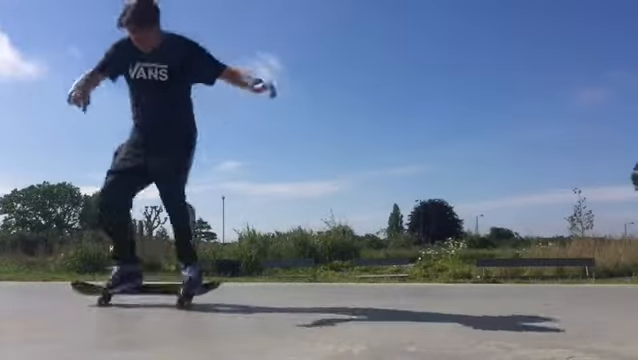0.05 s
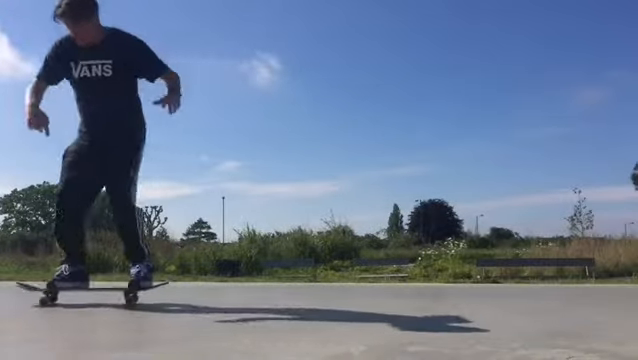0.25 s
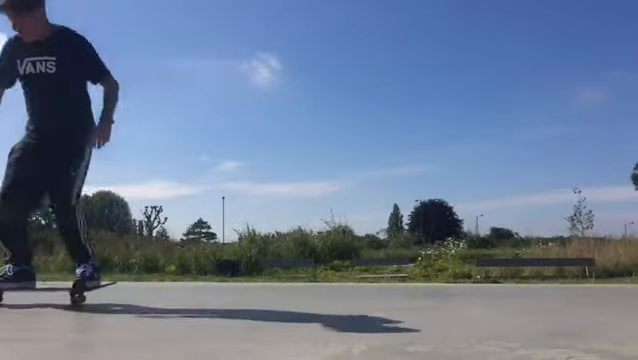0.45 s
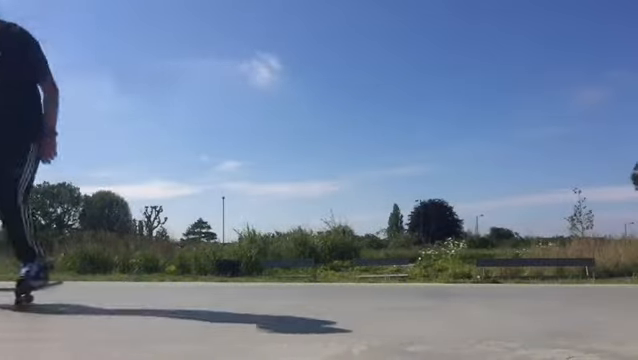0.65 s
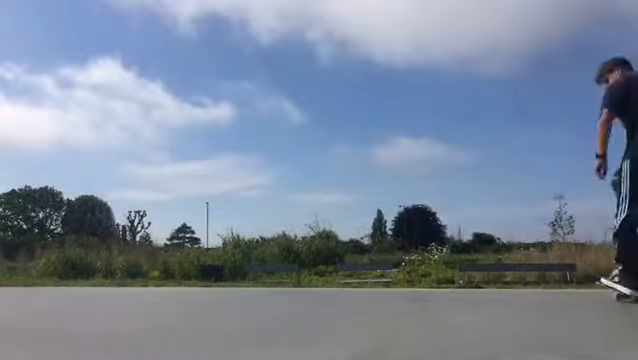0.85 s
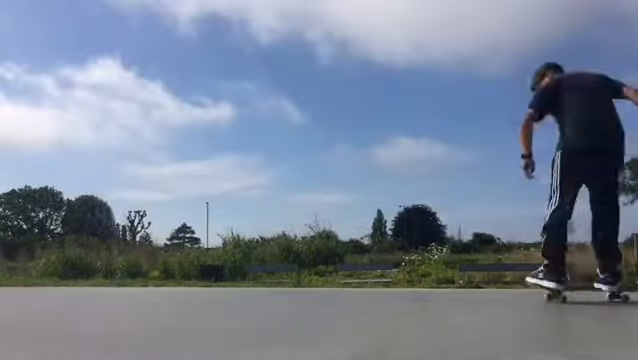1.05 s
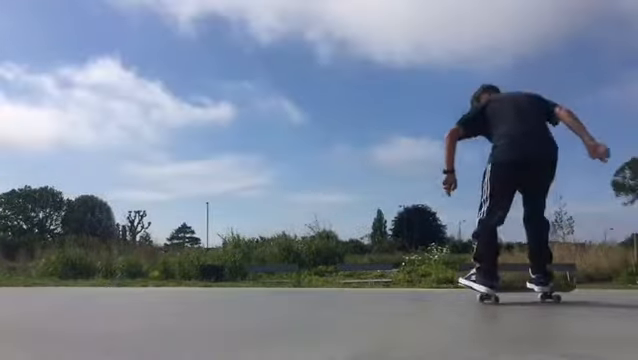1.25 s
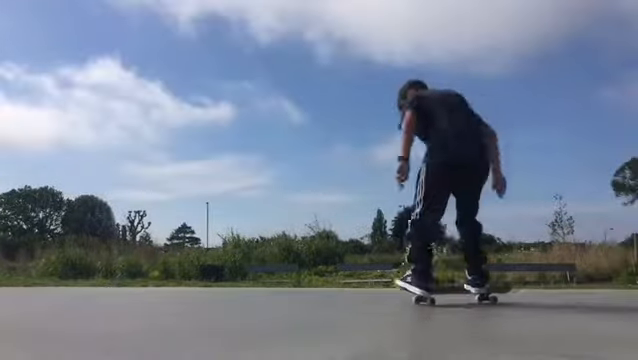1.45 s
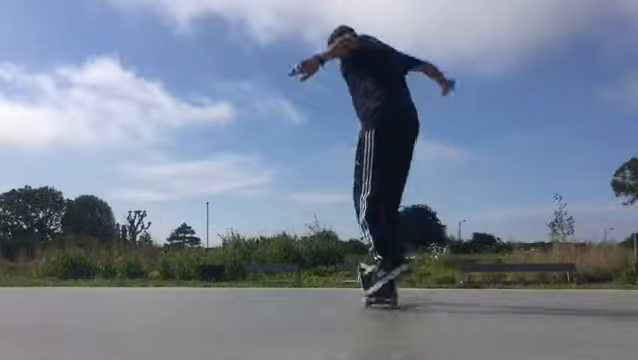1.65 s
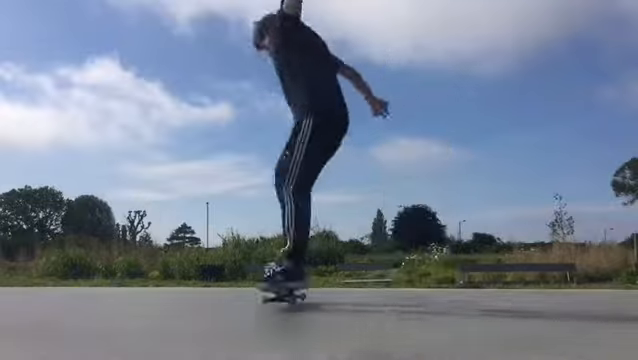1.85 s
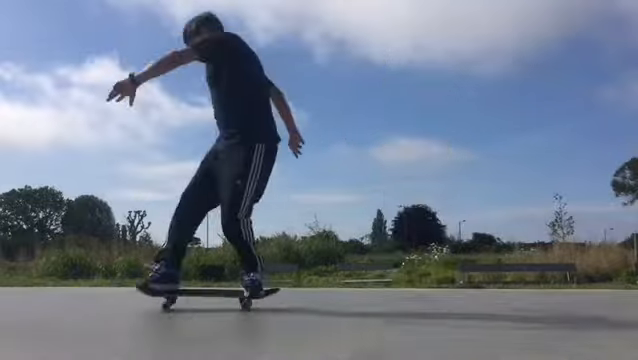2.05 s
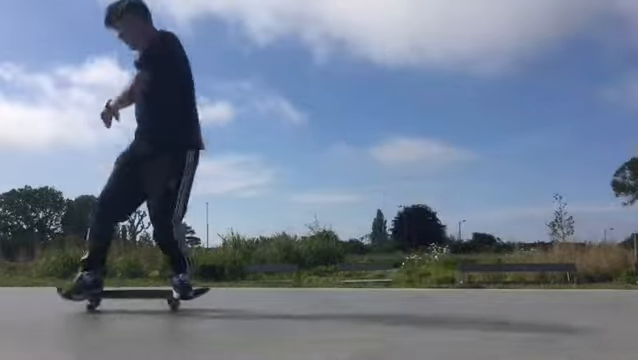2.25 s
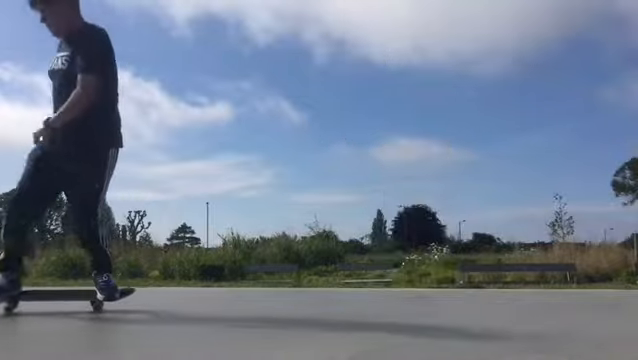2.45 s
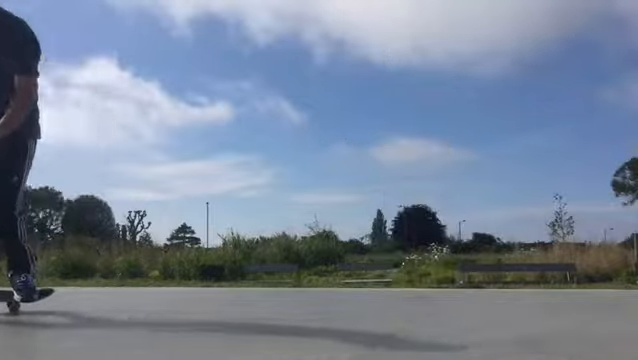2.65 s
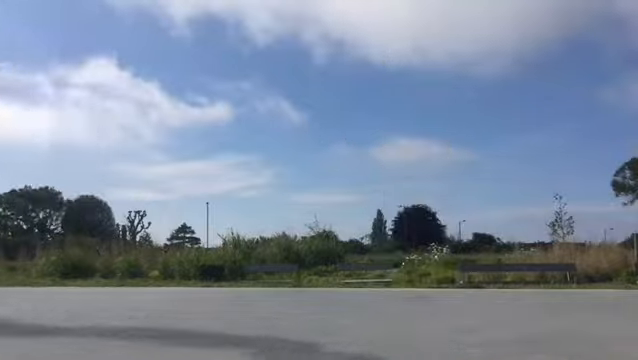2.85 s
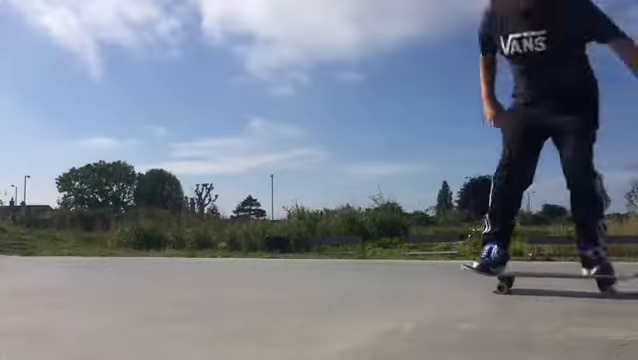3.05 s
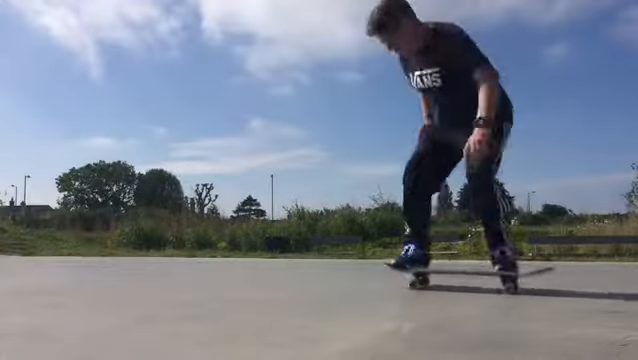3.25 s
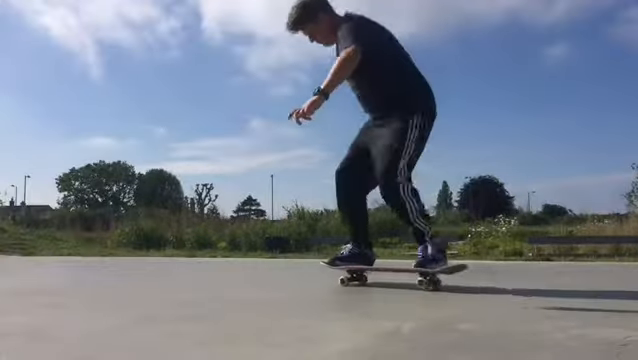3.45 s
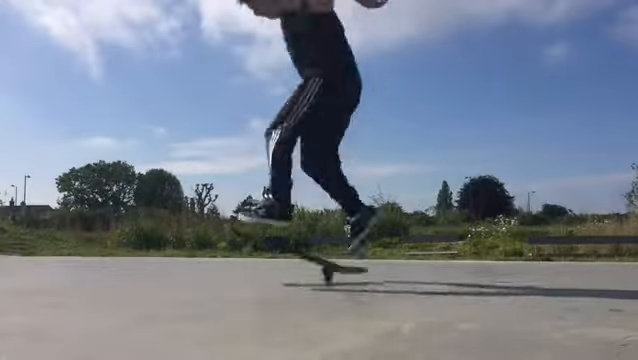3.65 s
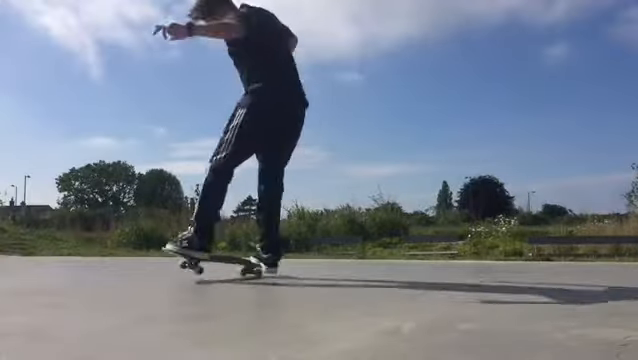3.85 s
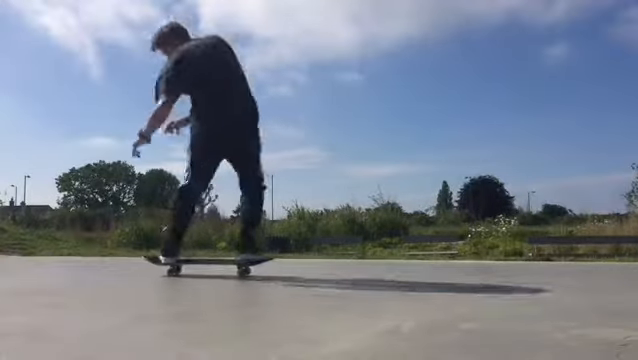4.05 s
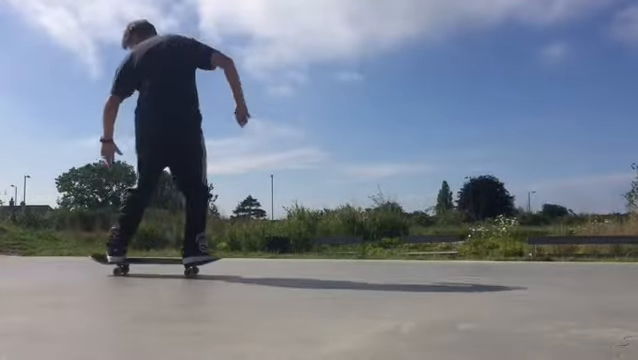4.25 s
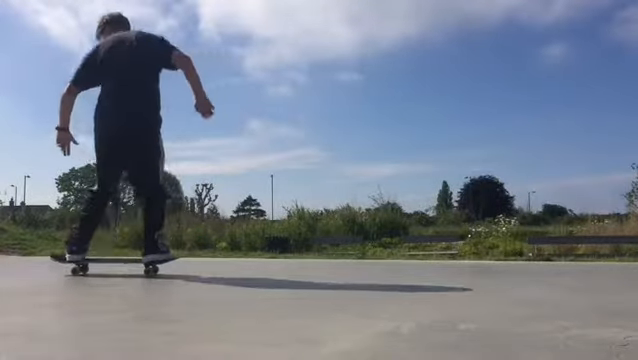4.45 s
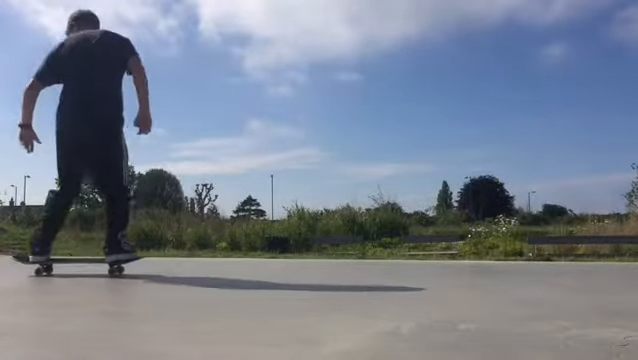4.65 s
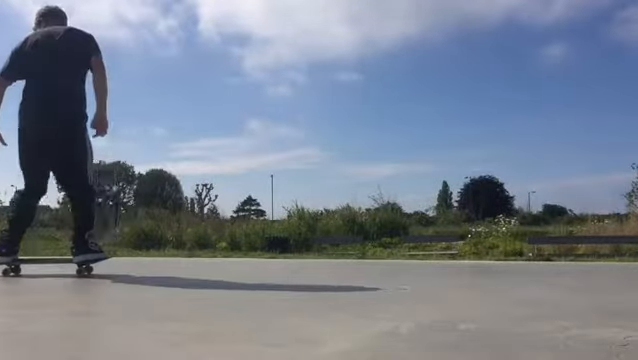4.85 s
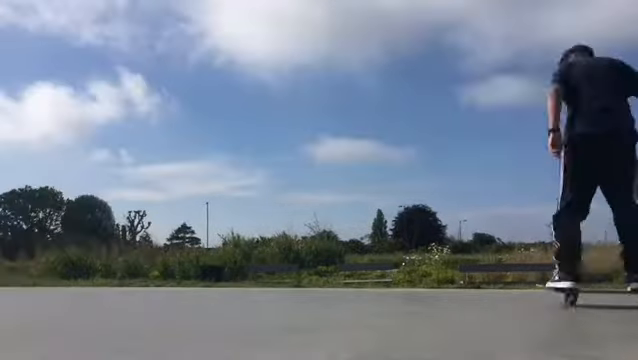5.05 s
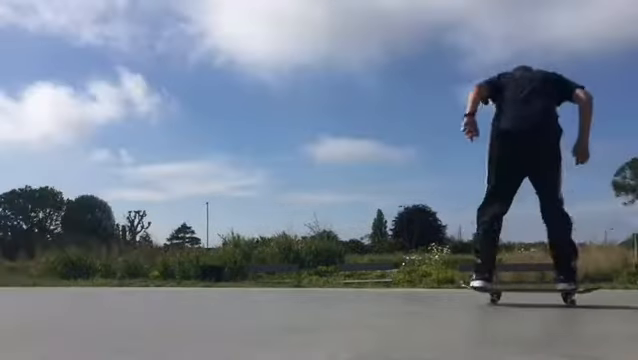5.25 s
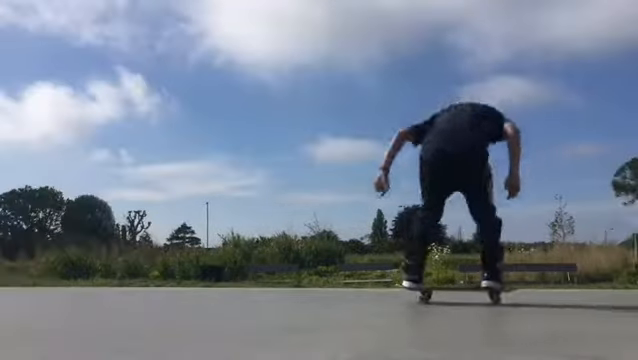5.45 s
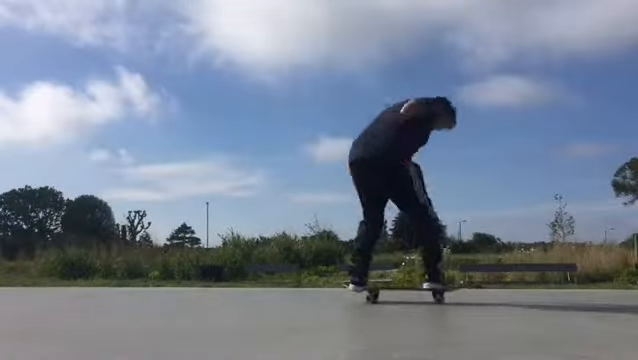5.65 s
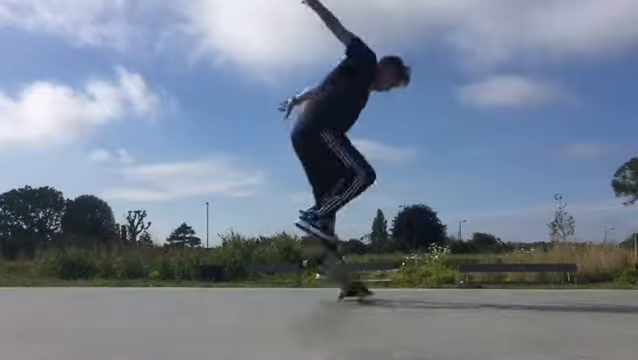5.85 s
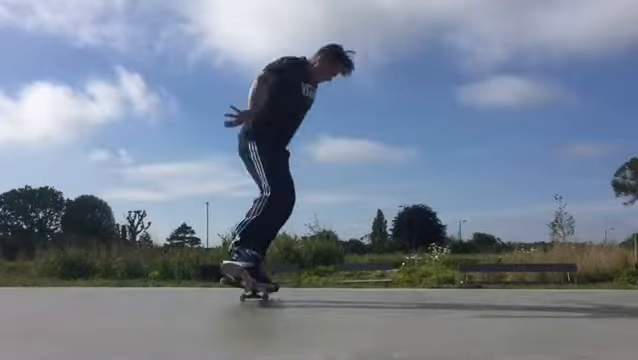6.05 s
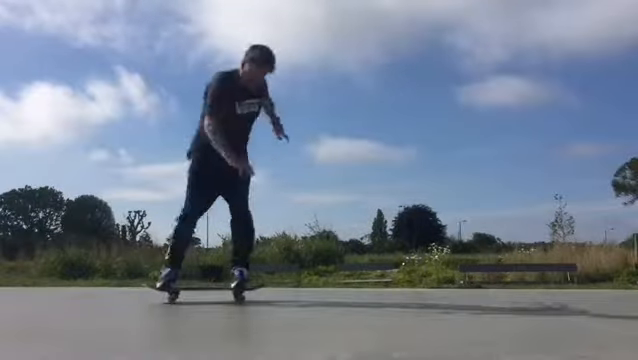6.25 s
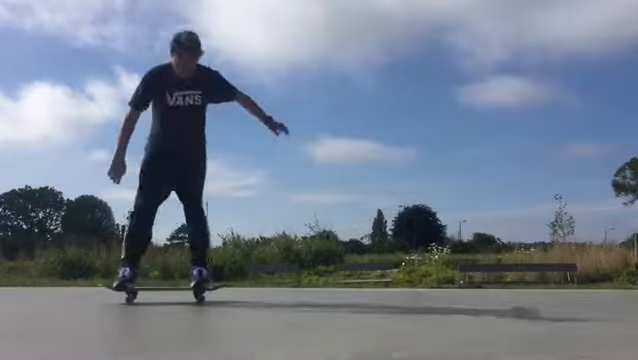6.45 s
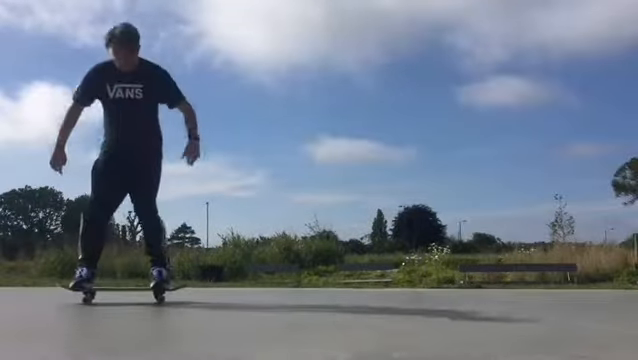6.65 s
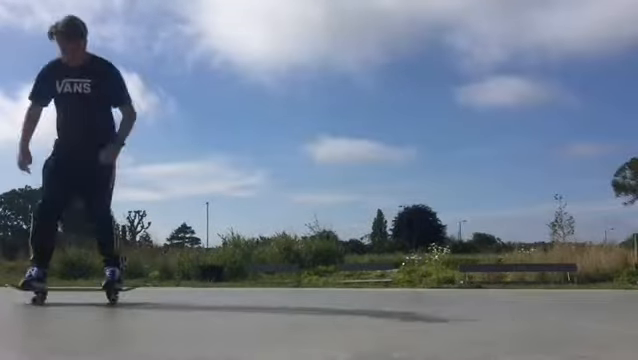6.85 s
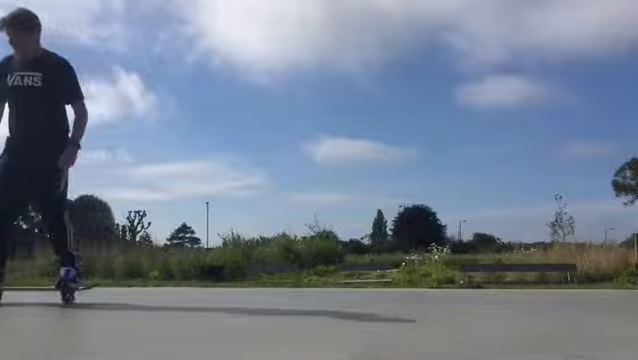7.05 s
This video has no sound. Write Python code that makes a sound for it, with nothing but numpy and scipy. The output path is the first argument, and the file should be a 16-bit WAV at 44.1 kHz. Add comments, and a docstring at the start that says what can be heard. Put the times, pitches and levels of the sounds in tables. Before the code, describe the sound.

A skateboarder performs four tricks on smooth concrete, close to a small microphone outdoors. At about 0.07 s a dense, very loud cluster of woody clacks marks a landing, with a lighter tap at 0.24, then soft rolling. A cut near 1.0 brings a fuller wheel roar and humming deck; scuffs lead to a quieter airborne gap near 1.85, then booming clacks at 2.03-2.12 and a slap with a short squeak at 2.27. Wheels roll off with a faint bearing rustle until 3.0. The third run-up has ticks at 3.1, a pop at 3.63, and a rattling landing from 3.93 to 4.08, with a squeaky skid at 4.16; rolling fades. The fourth starts at 5.2, ticks sharply at 5.4, and lands with hard, bright cracks at 6.23-6.27 and smaller slaps at 6.4. Quiet rolling continues to 7.2 over low open-air rumble, with barely any echo.

```python
"""Skateboard flip tricks on concrete

A skateboarder lands four flip tricks on smooth outdoor concrete, close to a small microphone.
Blows ring the maple deck as a bank of decaying modes with noise for grit; urethane wheels roar as filtered
noise and shake the deck's bending modes; skidding wheels squeal by stick-slip, as gliding harmonics.
Shoes scuff the grip tape in shaped noise, and the hardest blows overload the microphone."""
import sys
import numpy as np
from scipy import signal
from scipy.fft import rfft, irfft, next_fast_len
from scipy.io import wavfile
from scipy.ndimage import uniform_filter1d, map_coordinates

SR = 44100
rng = np.random.default_rng(int(sys.argv[2]) if len(sys.argv) > 2 else 0)


def wrap_up_sound(samples):
    """Save the sound to the file named by the first command line argument, as 16-bit audio."""
    columns = np.atleast_2d(samples).T
    # keep every value between -1 and 1, then stretch to whole-number steps
    tamed = np.clip(columns, -1, 1)
    steps = np.round(tamed * 32767).astype(np.int16)
    wavfile.write(sys.argv[1], SR, steps)


N = 313548
TIME = np.arange(N) / SR
BLOW_TIME = np.arange(SR // 2) / SR
TOP_HZ = 16100  # upper band limit of the microphone


def amp(db):
    """Level in decibels to amplitude ratio."""
    return 10 ** (np.asarray(db) / 20)


def unit(x, first=None):
    """Normalization: x scaled to rms 1, over all of it or over its first seconds."""
    head = x if first is None else x[:int(first * SR)]
    return x / np.sqrt(np.mean(head ** 2) + 1e-20)


def along(points, hz):
    """Interpolation of (frequency, value) points on a logarithmic frequency axis."""
    f, v = np.transpose(points)
    return np.interp(np.log(hz + 1), np.log(f + 1), v)


def wobble(rate, size=N):
    """Slow random modulation: a smooth curve through rate random knots a second."""
    knots = rng.standard_normal(int(size * rate / SR) + 4)
    return map_coordinates(knots, [np.arange(size) * rate / SR])


def filtered(x, response):
    """Linear filtering: the spectrum of x times a response of frequency."""
    m = next_fast_len(len(x) + 8192)
    return irfft(rfft(x, m) * response(np.fft.rfftfreq(m, 1 / SR)), m)[:len(x)]


def coloured(x, spectrum, size=4096):
    """Minimum-phase filtering: a causal filter with the given spectrum keeps attacks sharp."""
    cepstrum = irfft(np.log(amp(along(spectrum, np.fft.rfftfreq(size, 1 / SR)))))
    # fold the cepstrum onto positive times
    cepstrum[1:size // 2] *= 2
    cepstrum[size // 2 + 1:] = 0
    impulse_response = irfft(np.exp(rfft(cepstrum)))[:size // 2]
    return signal.fftconvolve(x, impulse_response)[:len(x)]


def grains(size, spiky_db):
    """Amplitude-modulated white noise: its strength varies quickly from one surface grain to the next."""
    return unit(rng.standard_normal(size) * amp(spiky_db * wobble(900, size)))


def patchy(x, patchy_db):
    """Spectral modulation: each stretch of concrete favours slightly different pitches."""
    z = signal.stft(x, nperseg=1024)[2]
    field = uniform_filter1d(rng.standard_normal(z.shape), size=3, axis=0)  # over frequency
    field = uniform_filter1d(field, size=6, axis=1)  # over time
    return signal.istft(z * amp(patchy_db * unit(field)), nperseg=1024)[1][:len(x)]


def dying(t60):
    """Damping: exponential decay by 60 dB in t60 seconds, over the length of a blow."""
    return amp(-60 * BLOW_TIME / t60)


def held(t, length, attack_s, release_t60, linger_db, linger_t60):
    """Two-rate decay: attack, hold and a quick release that leaves a weaker, slower tail."""
    after = np.maximum(t - length, 0)
    release = np.maximum(amp(-60 * after / release_t60), amp(linger_db - 60 * after / linger_t60))
    return np.clip(t / attack_s, 0, 1) * release


def add(track, s, x):
    """Superposition: mix x into the track at s seconds."""
    start = max(round(s * SR), 0)
    track[start:start + len(x)] += x[:max(N - start, 0)]


def faded(start, end, fade_s):
    """Linear gating: a gain that rises after start and falls before end."""
    return np.clip(np.minimum(TIME - start, end - TIME) / fade_s, 0, 1)


# the four rides:
# (start [s], end [s], upper bending mode against the lower [dB], background against its base level [dB])
RIDES = [(-.05, 0.974, 3, 2), (0.974, 3.015, -2.5, 1), (3.01, 5.203, -0.5, 1), (5.2, 7.199, 1, -2)]
# low outdoor background: (frequency [Hz], spectral level [dB])
AIR = [(20, -26), (32, -16), (48, 0.5), (68, 1.5), (100, -1), (140, -6.5), (220, -10.5), (320, -21),
       (500, -26.5), (1500, -28.5), (4000, -49), (10000, -52.5), (16000, -63.5)]


def outdoor_air():
    """Broadband ambient noise: a low outdoor rumble that dips briefly between rides."""
    base = amp(-44.0) * unit(coloured(rng.standard_normal(N), AIR))
    return base * sum(faded(start, end, 0.023) * amp(air_db) for start, end, _, air_db in RIDES)


def stance_db(s):
    """Modal excitation: where the feet stand in the ride at s seconds weights the upper bending mode."""
    return [mode_db for start, _, mode_db, _ in RIDES if start <= s][-1]


def dispersed(x, lag_s=0.001933, fast_hz=3000):
    """Dispersion: bending waves in wood travel slower the lower they are, so a blow chirps downward."""
    def response(hz):
        slowness = np.sqrt(1000 / np.maximum(hz, 150)) - np.sqrt(1000 / fast_hz)
        delay = lag_s * np.maximum(slowness, 0)
        return np.exp(-2j * np.pi * np.cumsum(delay) * hz[1])  # phase is the integral of delay
    return filtered(x, response)


def radiated(x, low_hz=146):
    """Radiation efficiency: a deck this small pushes little air below its first bending mode."""
    highpass = signal.butter(7, 1, "high", analog=True)
    return filtered(x, lambda hz: signal.freqs(*highpass, worN=hz / low_hz)[1])


# modes the board rings with: (frequency [Hz], mean level [dB], decay t60 [s])
BOARD_MODES = [(540, -1.5, 0.034), (621, -3, 0.037), (790, -5.5, 0.026), (914, 0.5, 0.022),
               (1010, -5.5, 0.038), (1128, -2, 0.023), (1275, -2, 0.014), (1440, -11, 0.032),
               (1709, 0, 0.017), (1827, -4, 0.042), (2036, -2.5, 0.039), (2400, -6.5, .03),
               (2950, -13, 0.045)]


def clack(centre_hz, chatter_t60, focus_db, chatter):
    """Modal synthesis: blow and chatter ring the board; contact place and hardness favour some modes."""
    ring = np.zeros(len(BLOW_TIME))
    for hz, db, t60 in BOARD_MODES:
        level_db = db + rng.normal(0, 2.5) - focus_db * abs(np.log2(hz / centre_hz))
        sign = rng.choice([-1, 1])
        ring += sign * amp(level_db) * dying(t60) * np.sin(2 * np.pi * hz * BLOW_TIME)
    force = chatter * rng.standard_normal(len(BLOW_TIME)) * dying(chatter_t60)
    force[0] += 1  # the blow itself
    return unit(signal.fftconvolve(force, ring)[:len(ring)], first=0.0059)


# tail, deck and wheels striking the ground:
# (time [s], clack [dB], deck boom [dB], foot knock [dB], crack [dB], clack centre [Hz], chatter t60 [s])
BLOWS = [(0.033, -21, -69, -28, -37.5, 833, 0.055), (0.0716, -4, -37, -13.5, -16, 970, 0.056),
         (0.085, -10, -27, -26.5, -18, 1296, 0.029), (0.091, -11, -35.5, -27.5, -15, 1150, 0.012),
         (0.238, -21.5, -34, -31, -34, 990, 0.012), (1.238, -25.5, -26, -42, -39, 890, 0.04),
         (2.027, -6, -12, -32, -9.5, 805, 0.039), (2.085, -7.5, -17.5, -35, -15.5, 900, 0.039),
         (2.09, -5.5, -31.5, -32, -23.5, 882, 0.02), (2.12, -15.5, -21, -28, -26.5, 790, 0.02),
         (2.27, -14.5, -26, -64, -22, 1890, 0.028), (2.288, -13.5, -60, -50, -28.5, 1186, 0.021),
         (3.629, -14.5, -61, -47, -17.5, 1340, 0.044), (3.638, -18, -68, -48, -26, 924, 0.03),
         (3.927, -14.5, -35, -23.5, -18, 930, 0.054), (3.949, -7.5, -41.5, -20.5, -16, 1104, 0.037),
         (3.987, -15.5, -38, -32.5, -38.5, 1593, 0.038), (4.0134, -6.5, -51, -18, -9, 1250, 0.022),
         (4.0228, -7, -24.5, -41, -10, 1003, 0.034), (4.031, -15, -27, -28, -12, 1128, 0.032),
         (4.079, -14.5, -33, -33, -23.5, 1090, 0.016), (4.153, -22.5, -35.5, -48.5, -21.5, 1610, 0.034),
         (4.234, -24.5, -50, -42, -35.5, 1155, 0.017), (5.399, -33, -31, -41.5, -38, 1130, 0.028),
         (6.225, -2.5, -25, -11, -13.5, 1400, 0.038), (6.25, -7.5, -26.5, -21, -18, 1150, 0.041),
         (6.265, -14, -28, -29, -29, 1293, 0.02), (6.3842, -19, -29, -51, -31, 962, 0.025),
         (6.3968, -12, -23, -41, -17, 1060, 0.033), (6.407, -25, -34, -50, -19, 1060, 0.028)]
# slow bending modes of the loaded deck: (frequency [Hz], level in a blow [dB], decay t60 in a blow [s])
BENDING = [(156, 4.5, 0.15), (198, 5.5, 0.16)]
# colours of the gritty crack and of the foot knock: (frequency [Hz], spectral level [dB])
CRACK = [(300, -16.5), (1000, 14.5), (2200, 7.5), (3300, 6), (4700, -0.5), (5800, -1), (7000, 0.5),
         (8500, -1), (10200, -10.5), (12000, -9), (16000, -21.5)]
KNOCK = [(30, -56), (80, -40), (130, -20), (220, -8), (310, -1.5), (400, -5), (480, -12.5), (900, -54.5)]


def blows():
    """Impact excitation: each contact sounds a clack, a gritty crack, a foot knock and a slow deck boom."""
    out = np.zeros(N)
    for s, clack_db, boom_db, knock_db, crack_db, centre_hz, chatter_t60 in BLOWS:
        crack = coloured(grains(len(BLOW_TIME), spiky_db=2) * dying(chatter_t60 * 1.2), CRACK)
        knock = coloured(rng.standard_normal(len(BLOW_TIME)) * dying(0.039), KNOCK)
        boom = sum(amp(db + lift_db) * dying(t60) * np.sin(2 * np.pi * hz * BLOW_TIME)
                   for (hz, db, t60), lift_db in zip(BENDING, (0, stance_db(s))))
        boom = boom * (1 - dying(0.012))  # the heavy deck takes a moment to swing
        wood = (amp(clack_db) * clack(centre_hz, chatter_t60, focus_db=8.5, chatter=0.098)
                + amp(knock_db) * unit(knock, first=0.0078)
                + amp(boom_db) * unit(boom, first=0.0035))
        add(out, s, radiated(dispersed(wood)) + amp(crack_db) * unit(crack, first=0.0074))
    return out


def settling(against_crack_db=-34, t60=0.56):
    """Friction noise: after every blow the soles grind into the grip tape, and the powers add."""
    power = np.zeros(N)
    for s, _, _, _, crack_db, _, _ in BLOWS:
        add(power, s, (amp(crack_db + against_crack_db) * dying(t60)) ** 2)
    return np.sqrt(power) * unit(coloured(grains(N, spiky_db=5), CRACK))


# faint answer of the open lot: (frequency [Hz], decay t60 [s])
LOT = [(150, 0.5), (1000, 0.3), (4000, 0.15), (12000, 0.084)]


def lot(x):
    """Diffuse reflection: thin scatter from the ground, benches and hedges, dying at its own rate per band."""
    hz, t, z = signal.stft(rng.standard_normal(SR // 2), SR, nperseg=256)
    decay = amp(-60 * t / along(LOT, hz)[:, None])
    tail = signal.istft(z * decay, SR, nperseg=256)[1]
    return signal.fftconvolve(x, tail / np.linalg.norm(tail))[:N]


# colour of sole and grip tape before tilting: (frequency [Hz], spectral level [dB])
SCUFF_COLOUR = [(60, -59.5), (130, -31), (220, -9.5), (400, -5), (600, 12), (1200, 15.5), (2100, 6),
                (3000, -0.5), (5000, -8.5), (8500, -11.5), (11000, -24), (16000, -24.5)]


def tilted(bright_db):
    """Spectral tilt: the scuff colour turned about 2 kHz by bright_db per octave."""
    return [(hz, level + bright_db * np.log2(hz / 2000)) for hz, level in SCUFF_COLOUR]


# soles dragging on grip tape and the board scraping:
# (time [s], length [s], level [dB], brightness [dB per octave])
SCUFFS = [(0.037, 0.037, -30, 0.5), (0.208, 0.027, -44.5, 3.5), (0.574, 0.049, -43.5, -7.5),
          (0.731, 0.03, -41, -14.5), (1.142, 0.108, -37, -0.5), (1.743, 0.068, -45, 2.5),
          (1.826, 0.051, -51.5, 3), (2.015, 0.022, -29, -4.5), (2.04, 0.047, -25, -1),
          (3.025, 0.107, -42, 0), (3.621, 0.018, -28.5, 3), (3.803, 0.016, -38, 2),
          (3.934, 0.013, -20.5, -2), (4.038, 0.029, -38, -15), (5.267, 0.13, -43.5, -3),
          (5.381, 0.083, -36, -1), (5.919, 0.032, -42.5, -4), (6.018, 0.017, -44.5, -2),
          (6.197, 0.02, -48, 0.5), (6.215, 0.0091, -30.5, -4.5), (6.238, 0.0094, -18.5, -3),
          (6.254, 0.022, -17.5, -3), (6.33, 0.041, -50.5, 5.5)]


def scuffs():
    """Sliding friction: short strokes of gritty noise."""
    out = np.zeros(N)
    for s, length, db, bright_db in SCUFFS:
        size = int(length * SR)
        stroke = grains(size, spiky_db=4) * signal.windows.tukey(size, .4)
        stroke = coloured(np.pad(stroke, (0, 512)), tilted(bright_db))  # room for the filter to ring out
        add(out, s, amp(db) * unit(stroke, first=size / SR))
    return out


# stretches of turning wheels (run-ups, pivots and roll-aways):
# (time [s], length [s], roar [dB], change as the board nears or leaves [dB per s],
#  upper roar, deck drone, grit [each dB against the roar])
ROLLS = [(0.25, 0.32, -46.5, -12.5, -14.5, -5.5, -29), (0.6, 0.39, -48, 2, -11, -20, -30),
         (0.987, 0.67, -39, -0.5, -13, 0.5, -28), (1.733, 0.11, -36, -25, -12, -2.5, -24.5),
         (1.92, 0.25, -55, 7, -6.5, 1, -17), (2.29, 0.64, -45.5, 2.5, -4, -2, -28),
         (3.013, 0.51, -40, 2, -7.5, -8.5, -27), (3.66, 0.12, -40.5, -5, -5.5, -20, -24.5),
         (4.201, 0.49, -50, -5, -11, -5, -19.5), (4.7, 0.64, -55.5, -5.5, -21, 1.5, -22),
         (5.218, 0.53, -41.5, -1.5, -6.5, 7, -28.5), (5.905, 0.035, -48, 12, -6, -22.5, -18.5),
         (5.999, 0.048, -47.5, -7.5, -3, -16, -25.5), (6.43, 0.68, -55.5, 7, -6.5, 5, -21)]


def roll_gains(attack_s=0.017, release_t60=0.53, spin_db=-17, spin_t60=2.5):
    """Power summation: each stretch takes the weight, drifts with distance, then lifted wheels spin on."""
    power = np.zeros((4, N))  # roar, upper roar, drone, grit
    for s, length, db, db_per_s, upper_db, drone_db, grit_db in ROLLS:
        t = TIME - s
        gain = amp(db + db_per_s * np.clip(t, 0, length))
        gain = gain * held(t, length, attack_s, release_t60, spin_db, spin_t60)
        power += np.outer(amp([0, upper_db, drone_db, grit_db]), gain) ** 2
    return np.sqrt(power)


def surface(patch_db=0.85, sway_db=0.44, pits_per_s=31, pit_db=-7.5, pit_t60=0.02):
    """Roughness modulation: patches of concrete, the rider's shifting weight and jolts over small pits."""
    pits = (rng.random(N) < pits_per_s / SR) * rng.random(N)
    jolts = amp(pit_db) * signal.fftconvolve(pits, dying(pit_t60))[:N]  # pit_db is the deepest pit's jolt
    return unit(amp(patch_db * wobble(45) + sway_db * wobble(5.5)) * (1 + jolts))


# the rider presses on the deck: (time of peak [s], width [s], drone swell [dB])
PRESSES = [(1.29, 0.05, 8.5), (1.53, 0.05, 9), (1.70, 0.069, 8.5), (2.33, 0.1, 13.5), (3.52, 0.052, 6.5),
           (5.56, 0.11, 2.5), (5.76, 0.06, 4.5), (6.98, 0.045, 4.5)]


def flexing(wander_db=2):
    """Load-dependent response: the deck's drone swells under the rider's weight and wanders in between."""
    presses_db = sum(db * np.exp(-((TIME - s) / width) ** 2) for s, width, db in PRESSES)
    return amp(presses_db + wander_db * wobble(9))


def roar(spectrum, split_hz=1450):
    """Rolling noise: lower and upper roar of the wheels on the concrete's fine texture."""
    noise = coloured(patchy(grains(N, spiky_db=0.5), patchy_db=4.0), spectrum)

    def lower(hz):
        return 1 / (1 + (hz / split_hz) ** 8)
    return unit(filtered(noise, lower)), unit(filtered(noise, lambda hz: 1 - lower(hz)))


def drone(upper_db, width_hz=10):
    """Forced resonance: unevenness under the wheels keeps the deck's two bending modes sounding."""
    def modes(f):
        response = 0
        for (hz, _, _), db, sign in zip(BENDING, (0, upper_db), (1, -1)):
            damping = 1j * f * width_hz
            response = response + sign * amp(db) * damping / (hz * hz - f * f + damping)
        return response
    hum = radiated(filtered(rng.standard_normal(N), modes))
    power = np.abs(uniform_filter1d(hum ** 2, SR // 8))
    return hum / np.sqrt(power + 1e-12)  # the rider's weight holds it fairly even


# wheel roar, one list for each ride: (frequency [Hz], spectral level [dB])
ROARS = [
    [(150, -23), (260, -13), (411, -5.5), (443, -11), (563, 6.5), (692, -1), (842, -0.5), (1550, 0),
     (1630, 6), (1740, -20), (1880, -1), (2050, 6), (2470, -9), (2610, -41), (3500, -35), (4550, -91),
     (7700, -120)],
    [(150, -35.5), (260, -2), (353, -8), (453, -20), (516, -2.5), (569, 2.5), (628, -3.5), (806, -3.5),
     (939, -3), (1260, -2.5), (1510, -9.5), (1950, -6.5), (2220, -17), (2530, -13.5), (3500, -42.5),
     (4550, -55.5), (7700, -120)],
    [(150, -25), (260, 2), (316, -5), (360, -3.5), (468, -10.5), (516, 4), (569, 1), (824, -1), (1150, 2),
     (1400, -10), (1510, -10.5), (1670, -8.5), (2310, -12), (3110, -35.5), (3500, -34), (4550, -70),
     (7700, -120)],
    [(150, -47.5), (260, -47), (434, -1.5), (527, 9), (723, 1), (780, 5.5), (833, 3), (1000, 5), (1300, -2),
     (1420, -8.5), (1740, -13), (2310, -17), (2820, -33.5), (3110, -30.5), (3500, -46.5), (4550, -62.5),
     (7700, -120)],
]
# grit under the wheels: (frequency [Hz], spectral level [dB])
GRIT = [(1800, -14.5), (2800, -1.5), (3800, 5.5), (5000, -1), (7000, 1), (9000, -5), (10500, -11),
        (13000, -14), (16000, -25)]


def rolling():
    """Roughness excitation: roar, drone and grit of the four rides; the level dips briefly between them."""
    roar_gain, upper_gain, drone_gain, grit_gain = roll_gains()
    texture = surface()
    deck_gain = drone_gain * flexing()
    grit = grit_gain * unit(coloured(patchy(grains(N, spiky_db=2.5), patchy_db=5.0), GRIT))
    out = np.zeros(N)
    for (start, end, mode_db, _), spectrum in zip(RIDES, ROARS):
        lower, upper = roar(spectrum)
        wheels = roar_gain * lower + upper_gain * upper + grit
        out += faded(start, end, 0.023) * (texture * wheels + deck_gain * drone(mode_db))
    return out


def judder(start=0.352, length=0.039, slips_hz=205, level_db=-48, bright_db=6.0):
    """Periodic stick-slip: a sole shifts on the grip tape in a quick, even run of tiny slips."""
    out, t = np.zeros(N), BLOW_TIME[:int(length * SR)]
    slips = rng.standard_normal(len(t)) * np.exp(-4 * (t * slips_hz % 1))
    add(out, start, amp(level_db) * unit(coloured(slips, tilted(bright_db))))
    return out


# short ticks, several where the wheels cross joints in the concrete: (time [s], level [dB], brightness [dB per
# octave])
TICKS = [(0.551, -55, 11), (0.67, -35.5, 3), (1.444, -34, -6.5), (1.869, -34.5, -5), (1.904, -38.5, -3),
         (1.917, -45, -1), (2.17, -42, 3), (3.092, -26.5, -7.5), (3.104, -25, -2.5), (4.615, -45.5, -2.5),
         (5.315, -39.5, -3.5), (5.402, -21, -3.5), (5.43, -33, 0), (6.569, -47, -1)]


def ticks():
    """Impulsive noise: single short ticks, as fast-decaying bursts."""
    out = np.zeros(N)
    for s, db, bright_db in TICKS:
        tick = coloured(rng.standard_normal(len(BLOW_TIME)) * dying(0.028), tilted(bright_db))
        add(out, s, amp(db) * unit(tick, first=.004))
    return out


# faint high chirps: (time [s], length [s], start frequency [Hz], end frequency [Hz], peak level [dB])
CHIRPS = [(0.572, 0.033, 6140, 6460, -60), (0.791, 0.05, 8050, 7900, -68), (4.376, .05, 9150, 9600, -62.5),
          (4.545, 0.027, 7750, 9270, -62.5), (4.564, .025, 9900, 9400, -62.5),
          (6.64, 0.027, 9630, 9740, -65), (7.038, 0.042, 6400, 6300, -64.5)]


def chirps(waver=0.028):
    """Frequency modulation: thin, wavering high squeaks from gliding sines."""
    out = np.zeros(N)
    for s, length, start_hz, end_hz, db in CHIRPS:
        size = int(length * SR)
        hz = np.linspace(start_hz, end_hz, size) * (1 + waver * wobble(640, size))
        add(out, s, amp(db) * np.sin(2 * np.pi * np.cumsum(hz) / SR) * np.hanning(size))
    return out


# stick-slip squeals of skidding wheels and soles:
# (time [s], length [s], start frequency [Hz], end frequency [Hz], level [dB], swell [dB],
#  second harmonic [dB], higher harmonics [dB], overtone loss over the squeal [dB], starting roughness [0-1])
SQUEALS = [(2.269, 0.0079, 972, 1010, -15, -8, 19, -5, 5, 0.35),
           (3.761, 0.019, 2195, 2163, -30.5, 0, -29, -53, 0.5, 0.4),
           (3.9912, 0.0029, 1602, 1800, -7, -7.5, 4, -16.5, 14, 0.28),
           (4.1603, 0.041, 918.6, 1031, -10.5, -5, 3, -7.5, 2, 0.5),
           (6.408, 0.023, 798, 979, -24.5, 12, 9.5, 2, 27.5, 0.95)]
SQUEAL_ATTACK_S, SQUEAL_RELEASE_T60_S = 0.0026, 0.013
SQUEAL_RING_DB, SQUEAL_RING_T60_S = -20, 0.089  # the wheel rings on once it grips
CATCH_SHARE, CATCH_S = 0.069, 0.006  # the pitch starts high and sinks as the weight comes on
ARCH_DB = 3.5  # extra level half way through a squeal
SMOOTHING = 0.9  # roughness falls by this many powers of e from start to end
RASP = 0.5  # grit thrown up at each slip, against the tone of a fully rough squeal


def squeals(fall_db=7.0, jitter=0.075, flutter_db=5.0):
    """Stick-slip oscillation: a skid slips once a cycle, roughly at first, then cleaner as its pitch glides."""
    out, t = np.zeros(N), BLOW_TIME[:SR // 6]
    k = np.arange(1, 17)[:, None]  # harmonic numbers
    for (s, length, start_hz, end_hz, db, swell_db,
         second_db, higher_db, loss_db, start_rough) in SQUEALS:
        progress = np.minimum(t / length, 1)
        glide = np.sin(np.pi / 2 * progress) ** 2
        hz = (start_hz + (end_hz - start_hz) * glide) * (1 + CATCH_SHARE * np.exp(-t / CATCH_S))
        rough = start_rough * np.exp(-SMOOTHING * progress)
        level = amp(db + swell_db * progress + ARCH_DB * np.sin(np.pi * progress))
        level = level * held(t, length, SQUEAL_ATTACK_S, SQUEAL_RELEASE_T60_S,
                             SQUEAL_RING_DB, SQUEAL_RING_T60_S)
        phase = 2 * np.pi * np.cumsum(hz * (1 + jitter * rough * wobble(900, len(t)))) / SR
        # the contact patch keeps changing shape
        flutter = flutter_db * np.array([wobble(140, len(t)) for _ in k])
        upper_db = higher_db - fall_db * np.log2(k / 3) + flutter
        overtone_db = np.where(k == 2, second_db, upper_db) - loss_db * progress
        gains = amp(np.where(k == 1, 0, overtone_db)) * (k * hz < TOP_HZ)
        harmonics = gains * np.sin(k * phase + rng.uniform(0, 2 * np.pi, k.shape))
        tone = np.sum(harmonics, 0) / np.sqrt(np.sum(gains ** 2, 0) / 2)
        # a puff of grit at every slip
        slips = unit(coloured(rng.standard_normal(len(t)) * (1 + np.cos(phase)), CRACK))
        add(out, s, level * (tone + RASP * rough * slips))
    return out


# rustle of the wheel bearings: (frequency [Hz], spectral level [dB])
BEARING = [(1500, -38), (2800, 4), (3700, 7.5), (4600, 5), (5200, -6), (6200, 0), (8000, -30), (14000, -25)]


def bearings(start=2.46, end=3.0, level_db=-61, turns_hz=14, swell_db=2, flare_db=4.5):
    """Rotational modulation: after the second landing the bearings rustle, swelling with each wheel turn."""
    turn = np.sin(2 * np.pi * turns_hz * TIME + wobble(5.6))
    rustle = unit(coloured(patchy(grains(N, spiky_db=3), patchy_db=3), BEARING))
    gain = amp(level_db + swell_db * turn + flare_db * wobble(40.13))  # it also flares unevenly
    return gain * faded(start, end, 0.012) * rustle


def scene():
    """Superposition of the tricks, their faint echo, the rolling between them and the outdoor air."""
    tricks = blows() + settling() + scuffs() + judder() + ticks() + squeals()
    echo = amp(-24) * lot(tricks)
    return (outdoor_air() + tricks + echo + rolling() + chirps() + bearings())[None]


def record(dry):
    """Saturation and band limiting: the microphone rounds off loud peaks and drops deep bass and top treble."""
    clipped = dry[0] / (1 + np.abs(dry[0]) ** 6) ** (1 / 6)

    def band(hz):
        treble_cut = np.clip((TOP_HZ - hz) / 500 + .5, 0, 1)
        bass_cut = hz ** 4 / (hz ** 4 + 31 ** 4)
        return treble_cut * bass_cut
    return filtered(clipped, band)[None]


dry = scene()
out = record(dry)
wrap_up_sound(out)
```